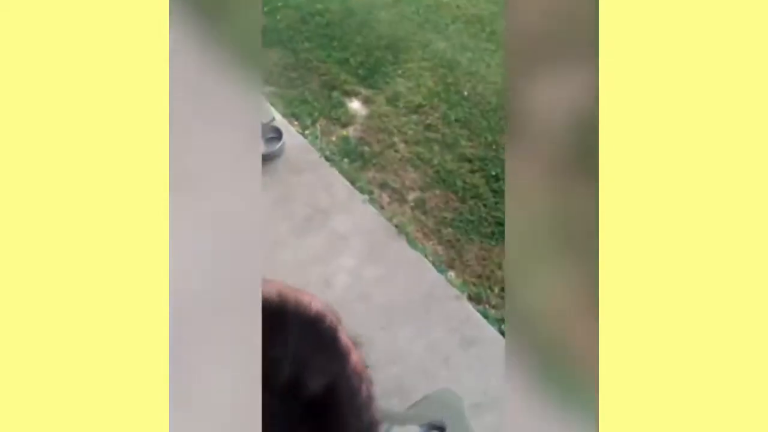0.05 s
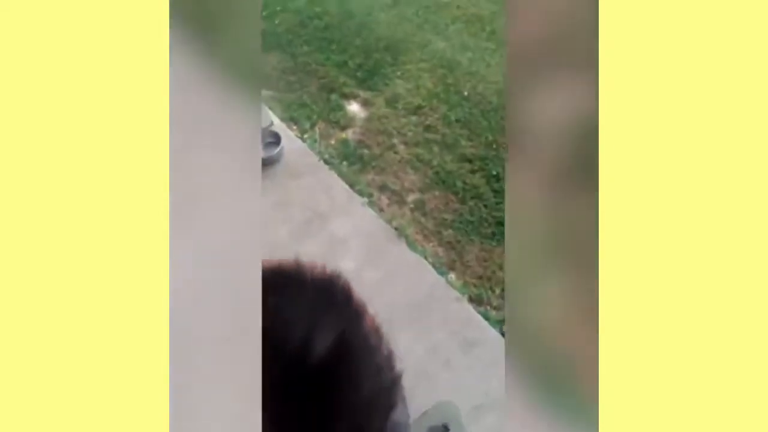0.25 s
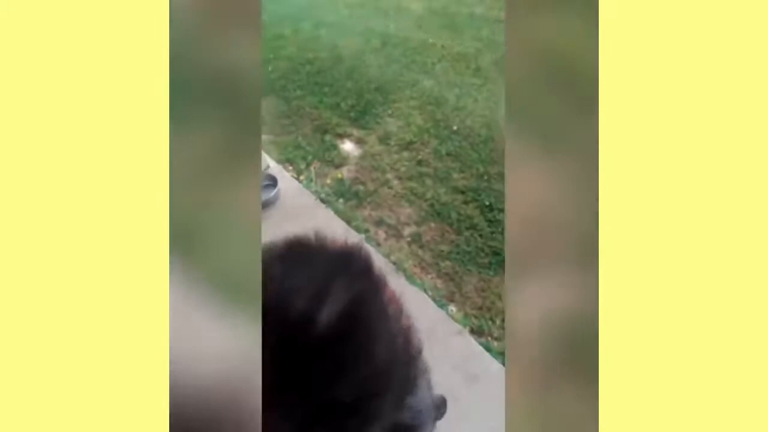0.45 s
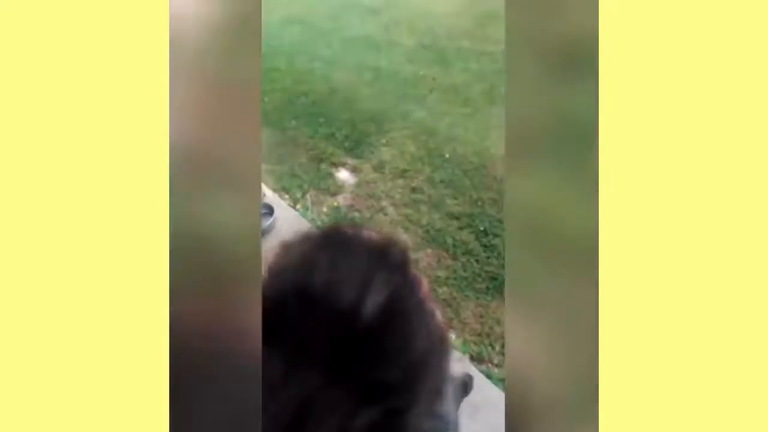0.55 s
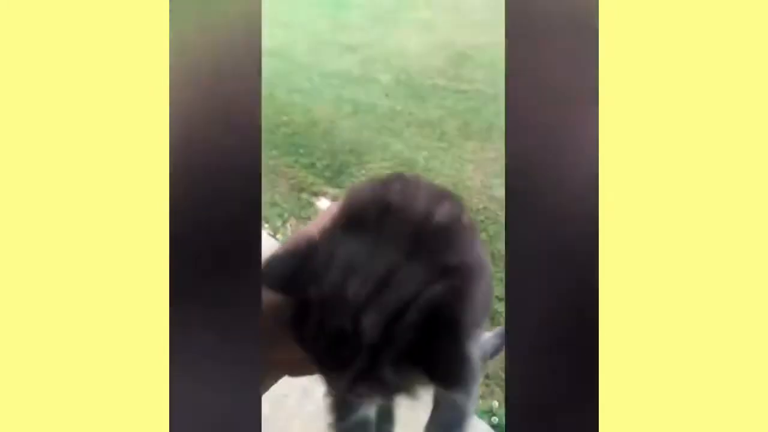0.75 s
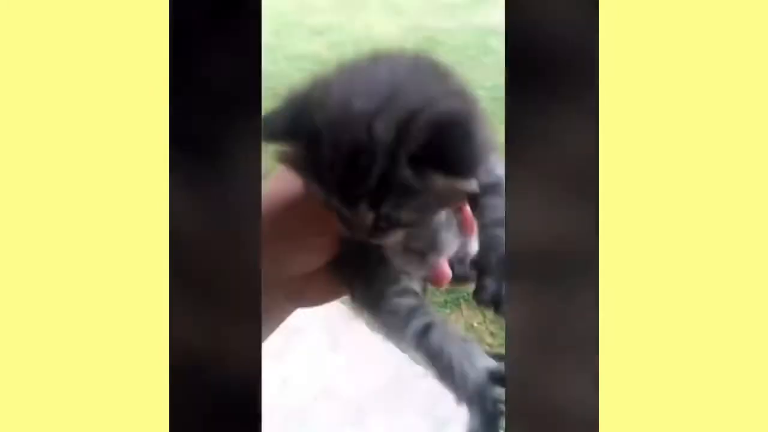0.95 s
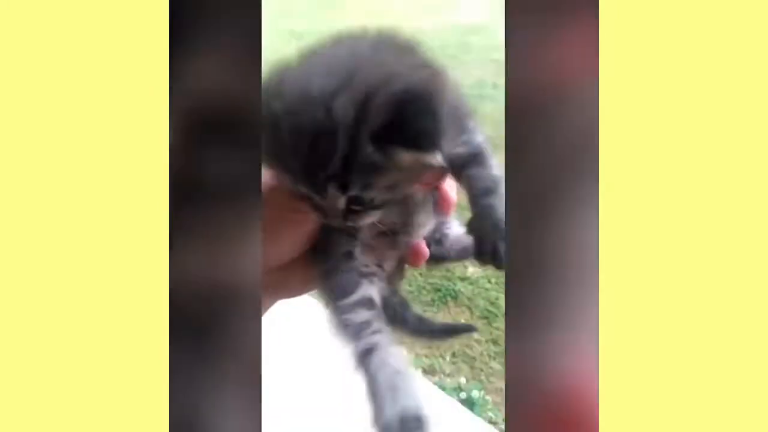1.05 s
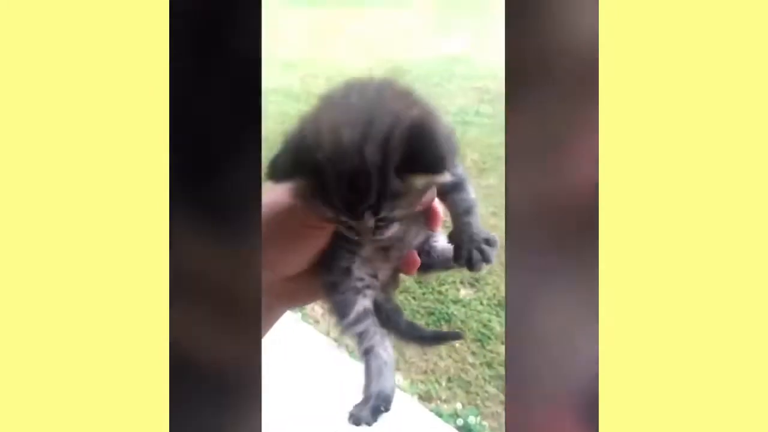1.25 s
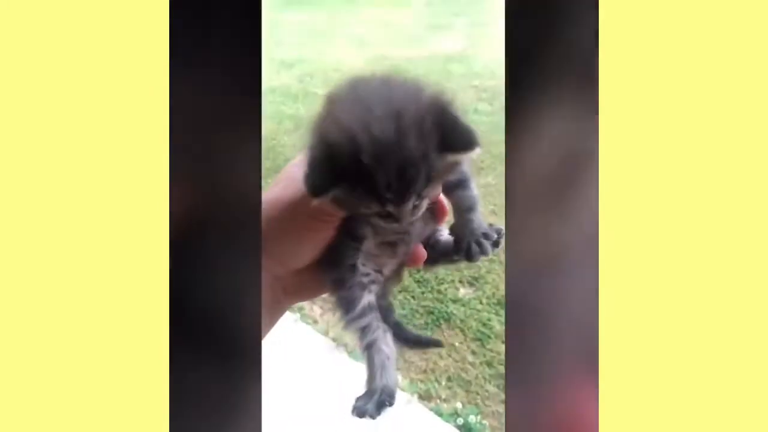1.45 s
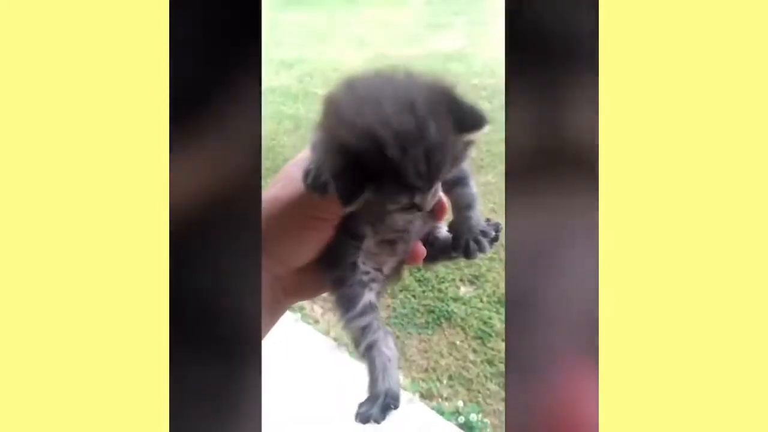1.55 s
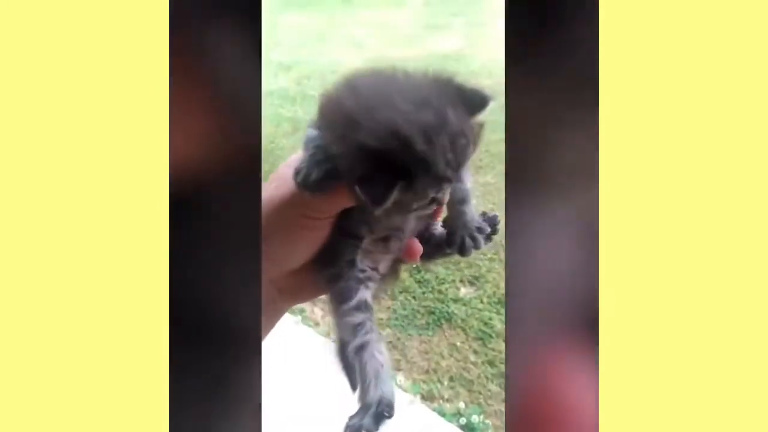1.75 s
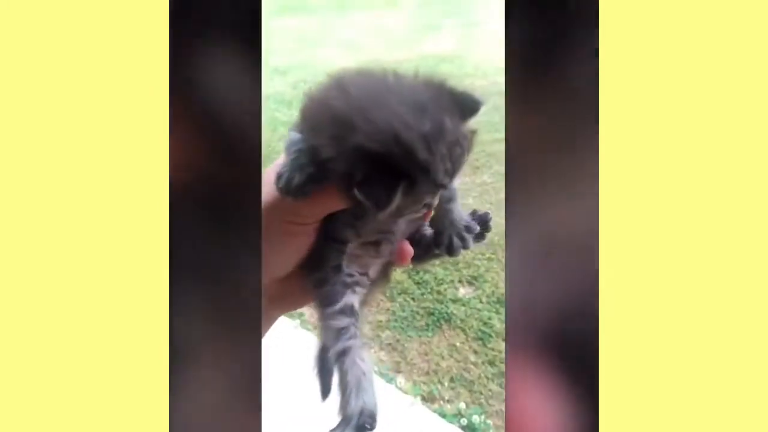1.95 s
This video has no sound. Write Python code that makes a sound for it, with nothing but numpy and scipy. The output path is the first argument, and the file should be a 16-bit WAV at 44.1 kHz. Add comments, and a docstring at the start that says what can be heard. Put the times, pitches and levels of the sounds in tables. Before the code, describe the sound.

A kitten mews close up in very short, shrill calls that arch up and drop, at about 0.23, 0.64, 1.1 and 1.64 seconds. A farther, hoarser cat calls from 0.1 to 0.6. A low handling thud with a tick lands at 0.82, and a faint creaky upward squeak at 1.57 leads into the last mew. Quiet outdoor air, low hum, varying hiss and slight patio and wall echoes lie beneath.

```python
"""Kitten and far cat in a yard

A kitten close to the microphone gives four short arched mews: shimmering harmonics plus pulsed noise rasp.
A farther cat calls once, longer and hoarser; a hand bumps the recorder: damped modes plus a noise tick.
A soft creaky glide leads into the last mew. Underneath: low noise with hum lines, outdoor air and hiss.
Decaying noise makes the near and house-wall echoes; frequency combs spread the stereo."""
import sys
import numpy as np
from scipy import signal
from scipy.fft import rfft, irfft, next_fast_len
from scipy.io import wavfile
from scipy.ndimage import uniform_filter1d, map_coordinates

SR = 44100
rng = np.random.default_rng(int(sys.argv[2]) if len(sys.argv) > 2 else 0)


def wav_out(sig):
    """Save sig, one row per channel (or a flat mono array), as 16-bit PCM at SR to the path in sys.argv[1]."""
    wavfile.write(sys.argv[1], SR, np.round(np.clip(np.atleast_2d(sig).T, -1, 1) * 32767).astype(np.int16))


N = 88200


def amp(db):
    """Decibels to gain."""
    return 10 ** (np.asarray(db) / 20)


def unit(x):
    """Scale to rms 1."""
    return x / np.sqrt(np.mean(x ** 2) + 1e-20)


def along(points, hz):
    """Interpolate (Hz, value) points on a log frequency axis."""
    point_hz, values = np.transpose(points)
    return np.interp(np.log(hz + 1), np.log(point_hz + 1), values)


def curves(rows):
    """One value per sample for each column after the time."""
    times_s, *columns = np.transpose(rows)
    return [np.interp(np.arange(N) / SR, times_s, column) for column in columns]


def gate(rows):
    """Open from the first row to the last, with soft edges."""
    t = np.arange(N) / SR
    is_open = (t > rows[0][0]) & (t < rows[-1][0])
    return uniform_filter1d(1. * is_open, size=128)


def wobble(rate_hz):
    """Smooth random curve through rate_hz normal knots a second."""
    knots = rng.standard_normal(N // 8)
    return map_coordinates(knots, [np.arange(N) * rate_hz / SR], mode="mirror")


def filtered(x, response):
    """Apply a complex response of frequency."""
    m = next_fast_len(N + SR // 2)
    spectrum = rfft(x, m) * response(np.fft.rfftfreq(m, 1 / SR))
    return irfft(spectrum, m)[..., :N]


def noise(spectrum):
    """Two unrelated coloured noises of joint rms 1."""
    white = rng.standard_normal((2, N))
    return unit(filtered(white, lambda hz: amp(along(spectrum, hz))))


def voice(pitch_hz, harmonics, jitter):
    """Harmonics (multiple, dB) of one unsteady pitch, each with its own shimmer; also returns the phase."""
    jitter_hz, shimmer_db, shimmer_hz = 701.4, 1.05, 223.6
    phase = 2 * np.pi * np.cumsum(pitch_hz * (1 + jitter * wobble(jitter_hz))) / SR
    tone = 0
    for k, db in harmonics:
        shimmering_db = db + shimmer_db * np.sqrt(k) * wobble(shimmer_hz)
        tone = tone + np.sqrt(2) * amp(shimmering_db) * np.sin(k * phase)
    return tone, phase


def drone():
    """Distant low drone: coloured noise plus hum lines wavering in level and phase, different in each ear."""
    # (frequency [Hz], relative density [dB per Hz])
    drone_spectrum = [(15, -53), (25, -30), (59, -9), (90, -3.5), (109, -2), (167, -4), (195, -1.5),
                      (216, -2.5), (275, -3), (444, -2.5), (484, -2.5), (1500, -35.5), (1950, -55),
                      (3300, -120)]
    # (frequency [Hz], level [dB])
    hum_lines = [(123, -62), (170, -64.5), (226, -68)]
    t = np.arange(N) / SR
    hum = np.zeros((2, N))
    for ear in hum:
        for hz, db in hum_lines:
            level = np.sqrt(2) * amp(db + 4.3 * wobble(8.25))
            ear += level * np.sin(2 * np.pi * hz * t + 1.47 * wobble(9))
    return amp(-56.5) * noise(drone_spectrum) + hum


def air():
    """Steady outdoor air noise and a high hiss that swells and sinks."""
    # (frequency [Hz], relative density [dB per Hz])
    air_spectrum = [(300, -20.5), (600, 7.5), (1200, -2), (2000, -7), (4000, -13.5), (7000, -16.5),
                    (15000, -43.5)]
    hiss_spectrum = [(3000, -11), (6500, -12.5), (9000, -4), (11500, -6), (14000, -10), (15500, -10.5)]
    # (time [s], level [dB])
    hiss_level = [(0, -49.5), (.09, -63), (.15, -61), (.25, -51), (.47, -66.5), (.88, -72.5), (1.04, -59.5),
                  (1.3, -63), (1.7, -60), (1.87, -62), (2, -76.5)]
    hiss_db, = curves(hiss_level)
    hiss = amp(hiss_db + 0.27 * wobble(29)) * noise(hiss_spectrum)
    return amp(-63) * noise(air_spectrum) + hiss


def far_cat():
    """Longer, hoarser meow from across the yard: pitch frays when low, upper harmonics fade as it goes."""
    # (time [s], pitch [Hz], voice level [dB], rasp level [dB])
    call = [(.1, 848.5, -66, -82), (.135, 888, -51, -43), (.16, 1072, -49.5, -45.5), (.185, 1270, -52, -45),
            (.225, 1366, -48, -48), (.33, 1400, -45, -52), (.4, 1351, -54, -57), (.476, 1307, -51.5, -68.5),
            (.52, 1155, -50, -73.5), (.555, 923, -59.5, -69), (.6, 898, -58, -68.5)]
    # (multiple of the pitch, relative level [dB])
    far_harmonics = [(1, 1.5), (2, 2.5), (3, -0.5), (4, -4), (5, -9.5), (6, -18)]
    # throat resonances: (frequency [Hz], gain [dB])
    throat = [(800, -0.5), (1300, -0.5), (2000, -10), (2800, -6.5), (3300, -11), (3900, 0.5), (4300, 1.5),
              (4900, -14.5), (5600, 2), (6600, 1.5), (8300, 2.5)]
    # (frequency [Hz], relative density [dB per Hz])
    rasp_spectrum = [(500, -28.5), (1100, 1.5), (2000, -4), (2700, -32), (3700, 7.5), (4800, -7),
                     (6500, -10), (8500, -5.5), (12000, -18.5), (15000, -14.5)]
    jitter, fray_exponent = .024, 2.2
    flutter_db, flutter_hz, dulling_db_per_s = 2.6, 110, 26

    pitch_hz, voice_db, rasp_db = curves(call)
    dull_db = dulling_db_per_s * (np.arange(N) / SR - call[0][0])
    harmonics = [(k, db - (k > 3) * dull_db) for k, db in far_harmonics]
    tone, _ = voice(pitch_hz, harmonics, jitter * (pitch_hz.max() / pitch_hz) ** fray_exponent)
    tone = filtered(tone, lambda hz: amp(along(throat, hz)))
    tone = amp(voice_db + flutter_db * wobble(flutter_hz)) * tone
    return gate(call) * (tone + amp(rasp_db) * noise(rasp_spectrum))


def kitten():
    """Each mew arches up and drops; a rasp pulsing with the folds follows its loudness. Mid and side."""
    # per mew, rows of (time [s], pitch [Hz], level of harmonics 1, 2, 3 [dB each])
    mews = [
        [(0.232, 712, -56, -52.5, -50), (0.235, 745, -43, -67, -62), (0.239, 863, -20, -48.5, -42),
         (0.248, 1065, -17, -31.5, -29.5), (0.26, 1236, -21.5, -18, -32.5), (0.27, 1415, -22.5, -22, -40),
         (0.287, 1493, -24, -22, -43), (0.298, 1455, -24, -20, -46), (0.304, 1110, -33.5, -63.5, -50),
         (0.312, 860, -53, -58, -72)],
        [(0.635, 900, -53, -56.5, -55), (0.642, 998, -33, -51.5, -44), (0.648, 1118, -22.5, -36.5, -42.5),
         (0.654, 1224, -22, -24.5, -48.5), (0.67, 1475, -22.5, -27.5, -28), (0.685, 1620, -32, -23.5, -30),
         (0.7, 1659, -36, -23.5, -34.5), (0.715, 1586, -33.5, -27.5, -36), (0.724, 1272, -31.5, -56.5, -57),
         (0.735, 980, -64.5, -74.5, -48)],
        [(1.094, 997, -30, -40, -65), (1.097, 1043, -39.5, -52, -49), (1.106, 1163, -25.5, -28, -54),
         (1.115, 1316, -31.5, -33, -71.5), (1.127, 1410, -25, -23.5, -39.5), (1.134, 1461, -22.5, -22, -35.5),
         (1.153, 1514, -29.5, -20, -45.5), (1.164, 1496, -31, -23.5, -44), (1.175, 1425, -32.5, -36.5, -53.5),
         (1.185, 1154, -55.5, -61, -50)],
        [(1.636, 1232, -50, -39, -58), (1.647, 1276, -33, -47, -66.5), (1.655, 1330, -44, -31, -60),
         (1.668, 1406, -29, -22.5, -53), (1.682, 1435, -25, -29, -37.5), (1.702, 1385, -31.5, -21, -38),
         (1.707, 1327, -36, -47, -38), (1.714, 1317, -48, -37.5, -32.5), (1.721, 1200, -32, -52, -72),
         (1.728, 960, -50.5, -68, -44)],
    ]
    # per mew: (fourth harmonic re voice [dB], rasp re voice [dB], side re mid of the tone [dB])
    mew_colour = [(-24.5, -23, -7), (-24.5, -18, 1), (-31, -22.5, 2), (-32, -23, 2.5)]
    # (frequency [Hz], relative density [dB per Hz])
    rasp_spectrum = [(500, -40.5), (1000, -4.5), (1900, -9), (3200, -12), (4300, 1), (6000, -2),
                     (7500, -4.5), (10000, -15), (12500, -6.5), (14700, -8), (16000, -16.5)]
    jitter, overtone_db_per_step = .005, -5  # the step is per harmonic above the fourth
    rasp_follows, rasp_spread_s = 0.49, 0.0097  # rasp swells less than the tone and outlasts it

    out = np.zeros((2, N))
    for rows, (fourth_db, rasp_db, width_db) in zip(mews, mew_colour):
        pitch_hz, *levels_db = curves(rows)
        loud_db = 10 * np.log10(sum(amp(db) ** 2 for db in levels_db))
        levels_db += [loud_db + fourth_db + overtone_db_per_step * k for k in range(4)]
        tone, phase = voice(pitch_hz, enumerate(levels_db, 1), jitter)

        peak_db = loud_db.max()
        effort = gate(rows) * amp(peak_db + rasp_follows * (loud_db - peak_db))
        effort = uniform_filter1d(effort, size=max(1, int(rasp_spread_s * SR)))
        fold_pulse = 1 + 0.2 * np.cos(phase)
        rasp = amp(rasp_db) * effort * noise(rasp_spectrum) * fold_pulse

        mid_side_gains = unit(amp([[0], [width_db]]))
        out += gate(rows) * tone * mid_side_gains + rasp
    return out


def bump(comb_hz):
    """Knock on the case: a tick and a damped low thud, late in the left channel, inverted in the right."""
    # modes of the recorder's case: (frequency [Hz], level before the high-pass [dB], t60 [s])
    case_modes = [(138.2, -15, 0.049), (214, -25.5, 0.041), (427, -38.5, 0.039), (940, -50, 0.016)]
    start_s, tick_db, tick_t60_s = .8235, -36, 0.0076
    t = np.maximum(np.arange(N) / SR - start_s, 0)
    thud = sum(amp(db - 60 * t / t60_s) * np.sin(2 * np.pi * hz * t) for hz, db, t60_s in case_modes)
    thud = signal.sosfilt(signal.butter(2, 60, "high", fs=SR, output="sos"), thud)
    tick = (t > 0) * amp(tick_db - 60 * t / tick_t60_s) * rng.standard_normal((2, N))
    return np.array([np.roll(thud, int(SR / comb_hz)), -thud]) + tick


def squeak():
    """Soft, creaky upward glide: strongly jittered harmonics plus noise."""
    # (time [s], pitch [Hz], level [dB])
    glide = [(1.572, 351, -53), (1.58, 380, -48), (1.598, 556, -51), (1.613, 835, -53), (1.628, 1045, -53)]
    # (multiple of the pitch, relative level [dB])
    squeak_harmonics = [(1, 7), (2, -10), (3, -10)]
    # (frequency [Hz], relative density [dB per Hz])
    rasp_spectrum = [(300, -4), (900, 0.5), (1600, -2), (2500, -15), (8000, -29)]
    pitch_hz, db = curves(glide)
    tone, _ = voice(pitch_hz, squeak_harmonics, jitter=0.1)
    level = gate(glide) * amp(db + 1.67 * wobble(150))
    return level * (tone + amp(-11) * noise(rasp_spectrum))


def echoes(x, t60s, db, delay_s):
    """Short delayed wash of reflections: noise tails with a decay time per frequency."""
    hz, t, z = signal.stft(rng.standard_normal((2, SR // 2)), SR, nperseg=256)
    decay = amp(-60 * t / along(t60s, hz)[:, None])
    _, tail = signal.istft(z * decay, SR, nperseg=256)
    wet = signal.fftconvolve(x, tail / np.linalg.norm(tail[0]), axes=1)[:, :N]
    return amp(db) * filtered(wet, lambda f: np.exp(-2j * np.pi * f * delay_s))


def microphones(x, comb_hz):
    """Mid and side pass through interleaved combs, notches comb_hz apart, and become left and right."""
    notch_gain, fill_hz = 0.022, 10660  # the notches fill up toward fill_hz

    def combs(hz):
        sin, cos = np.sin(np.pi * hz / comb_hz), np.cos(np.pi * hz / comb_hz)
        fill = np.clip(notch_gain + (hz / fill_hz) ** 3, 0, .7)
        mid_comb = np.hypot(sin, fill * cos)
        side_comb = 1j * cos - (fill + 0.054) * sin
        return np.array([mid_comb, side_comb]) / np.hypot(1, fill)

    mid, side = filtered(x, combs)
    return np.array([mid + side, mid - side])


def scene():
    """Cats, handling and the yard at the microphones."""
    # echo decay: (frequency [Hz], t60 [s])
    near_t60 = [(300, 0.089), (1500, 0.099), (3200, 0.13), (14000, .13)]  # hand, body and patio
    wall_t60 = [(300, 0.12), (1500, 0.33), (3200, 0.23), (6000, 0.4), (14000, 0.18)]  # house wall
    comb_hz = 2468
    balance_db = -2  # left minus right

    cats = far_cat() + kitten() + squeak()
    near = echoes(cats, near_t60, db=-13, delay_s=.005)
    wall = echoes(cats, wall_t60, db=-26.5, delay_s=0.027)
    heard = microphones(cats + near + wall + air(), comb_hz)
    return (heard + bump(comb_hz) + drone()) * amp([[balance_db / 2], [-balance_db / 2]])


def record(dry):
    """The recorder keeps nothing above its band limit."""
    top_hz = 15500
    return filtered(dry, lambda hz: hz < top_hz)


dry = scene()
out = record(dry)
wav_out(out)
```